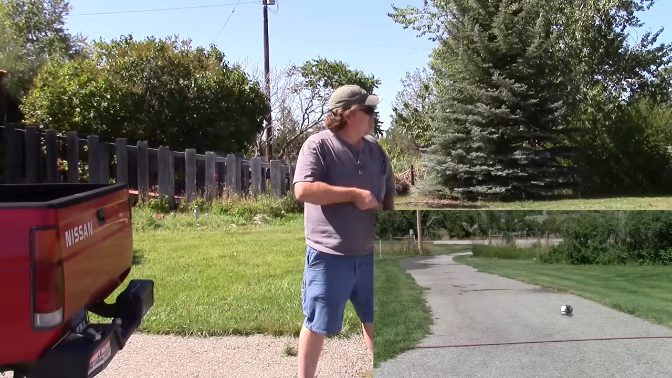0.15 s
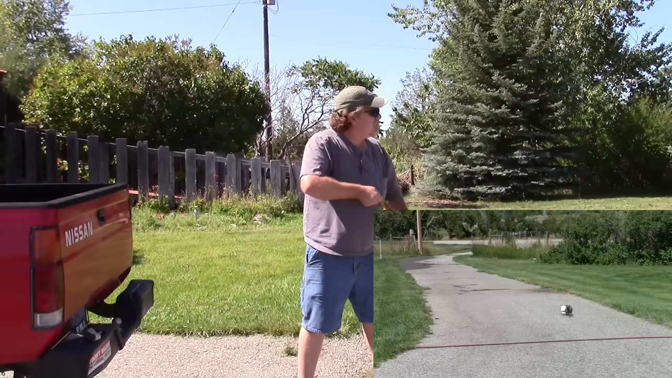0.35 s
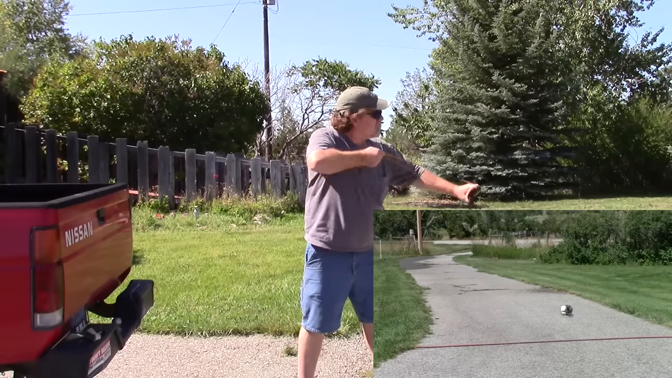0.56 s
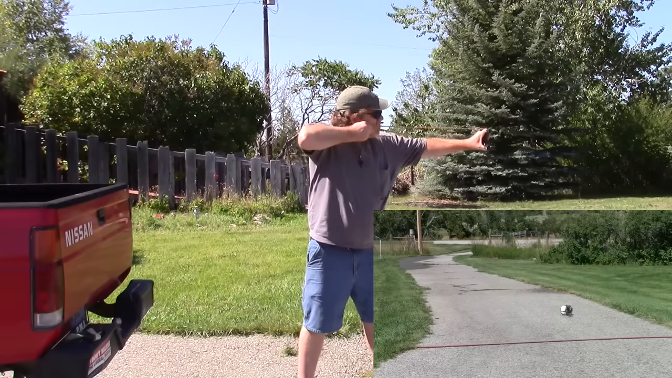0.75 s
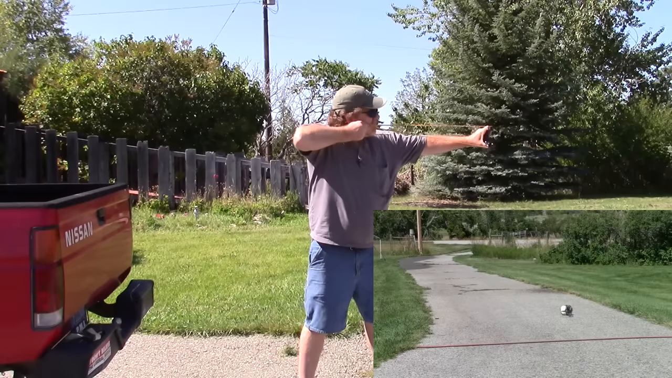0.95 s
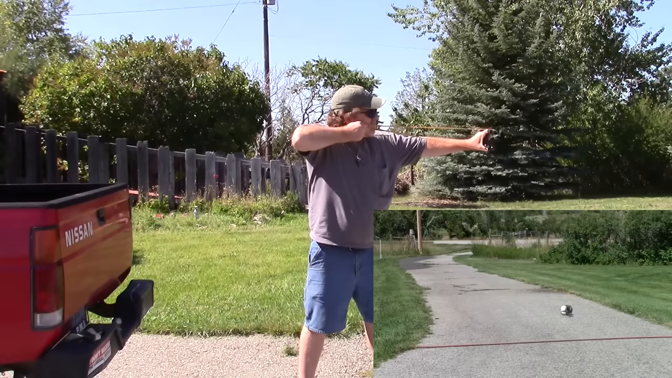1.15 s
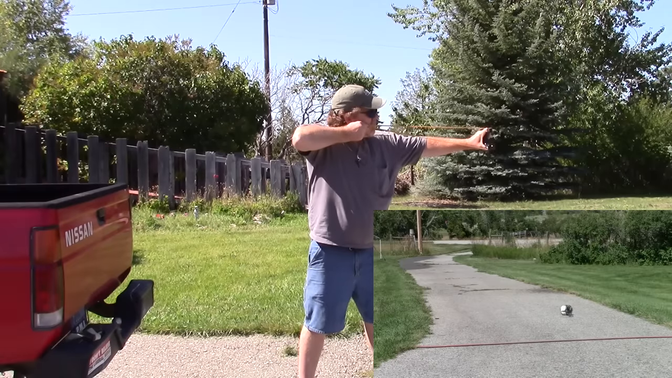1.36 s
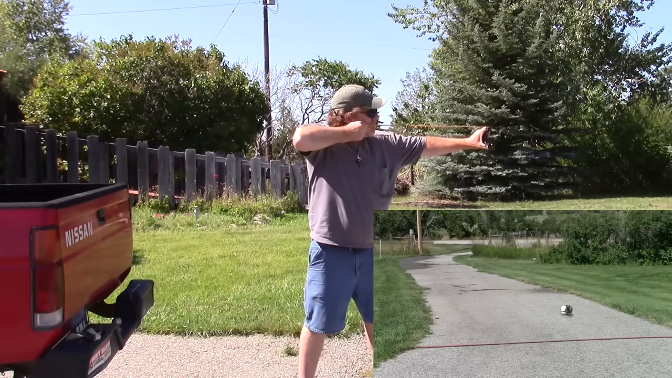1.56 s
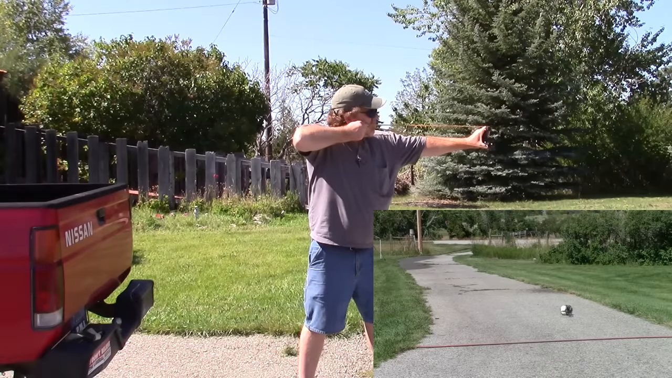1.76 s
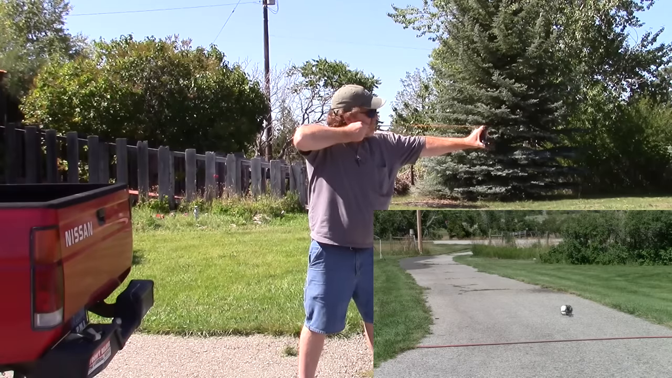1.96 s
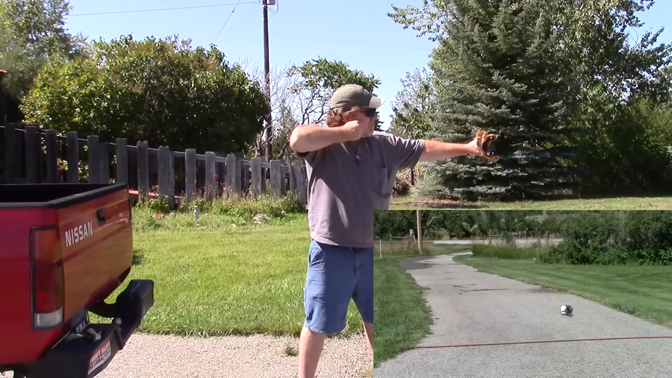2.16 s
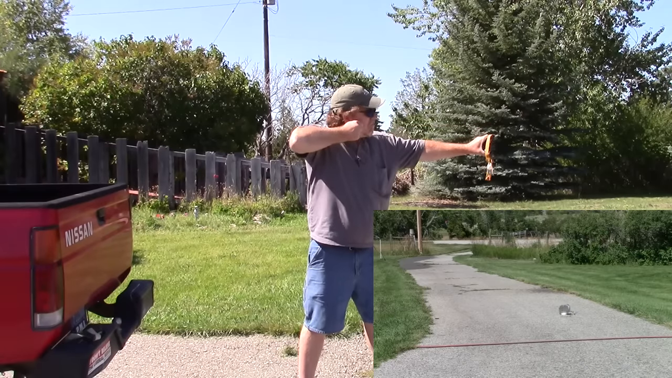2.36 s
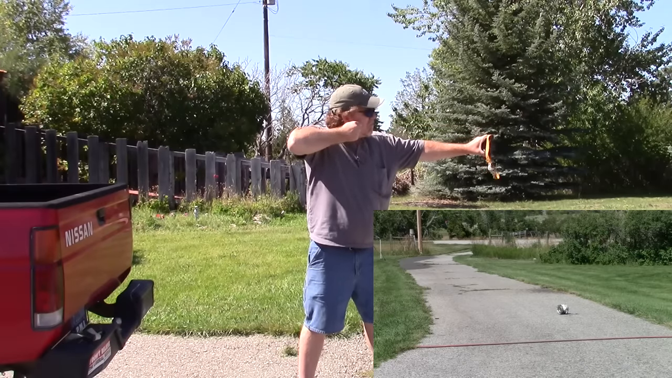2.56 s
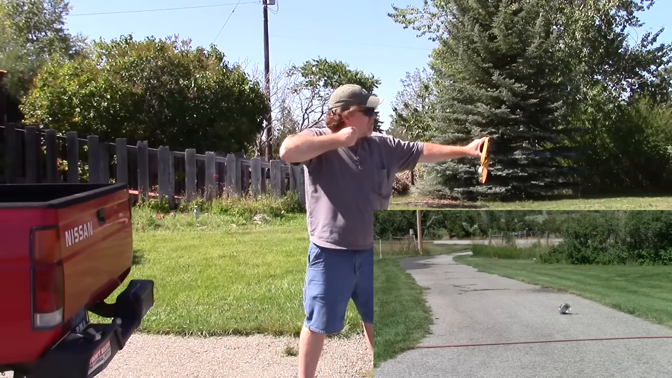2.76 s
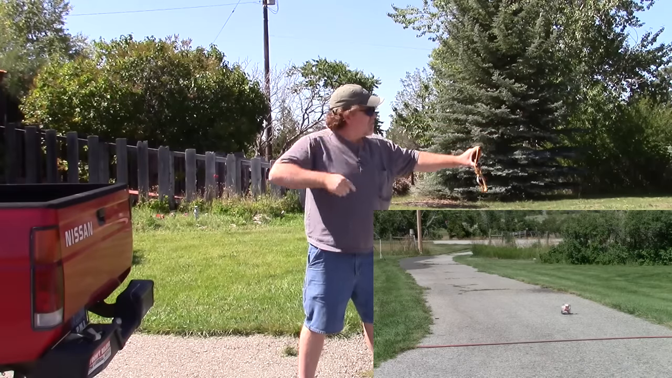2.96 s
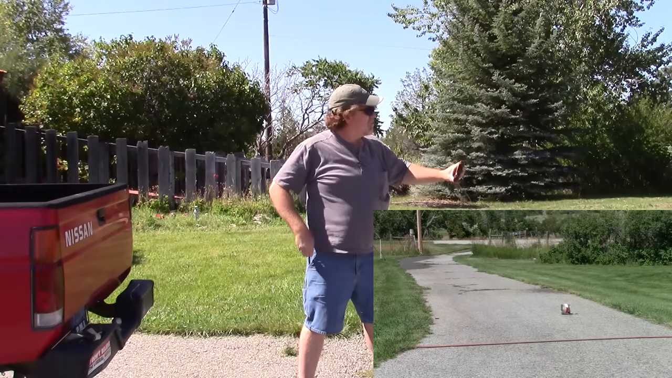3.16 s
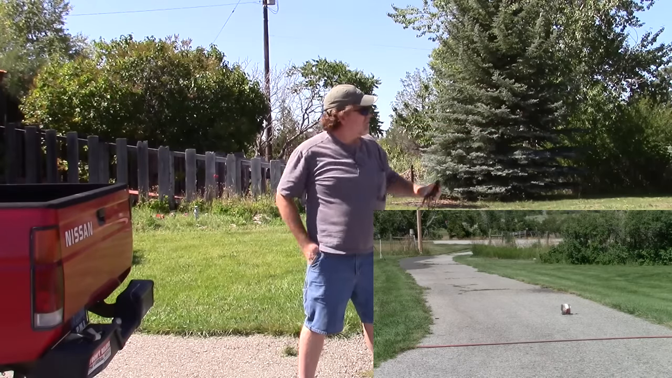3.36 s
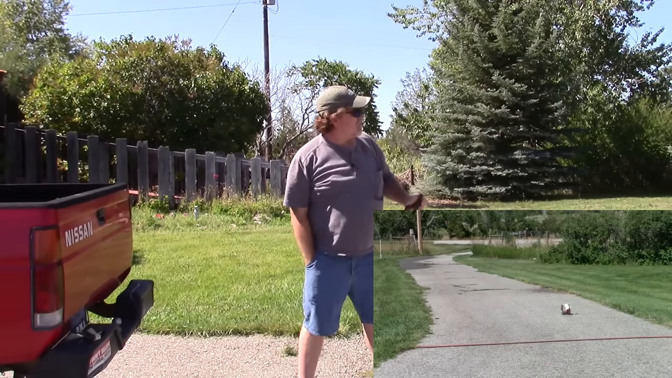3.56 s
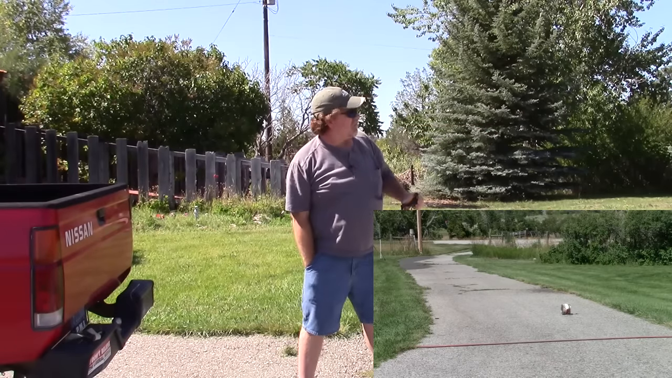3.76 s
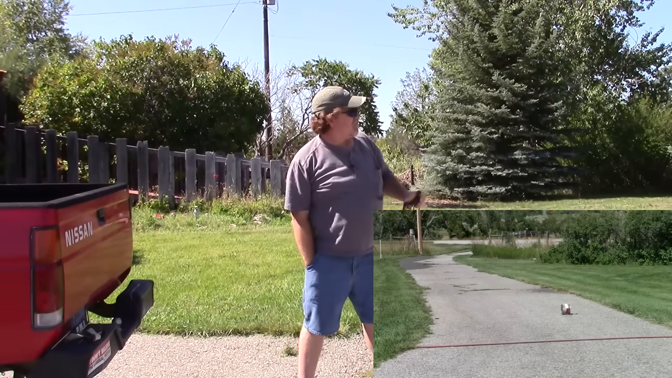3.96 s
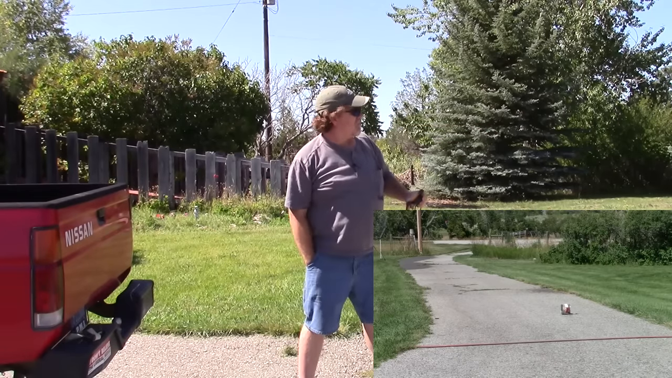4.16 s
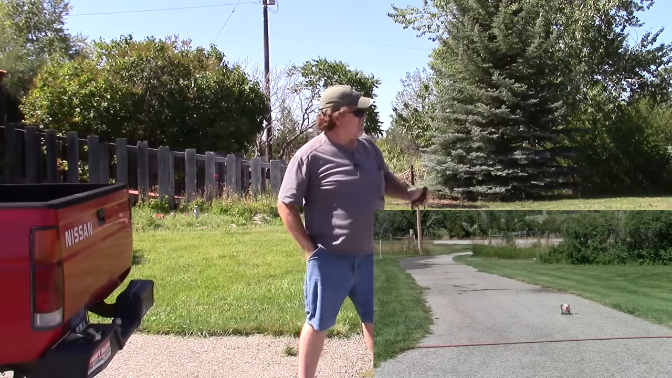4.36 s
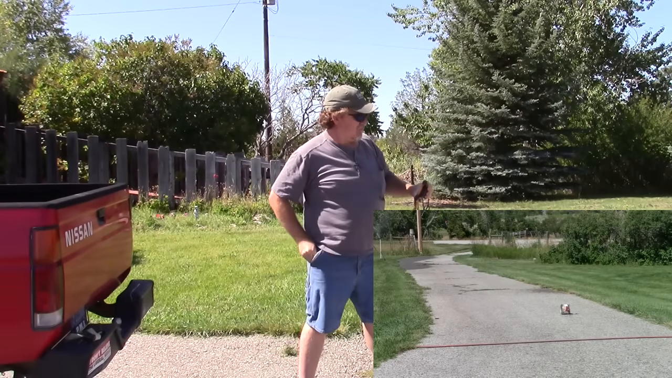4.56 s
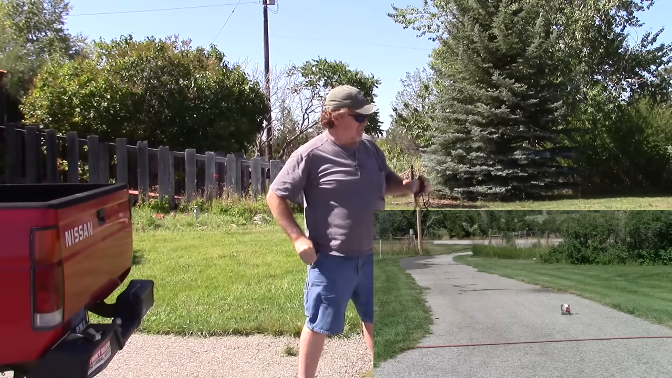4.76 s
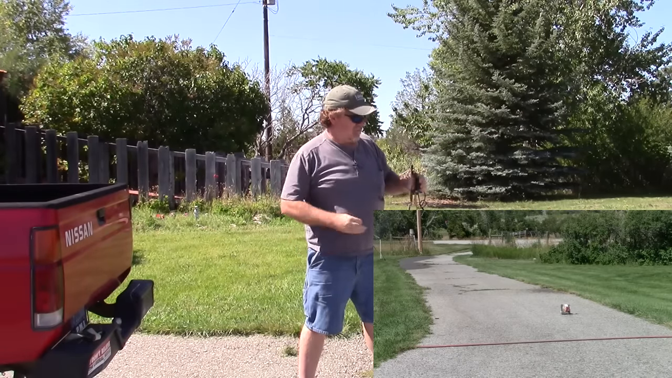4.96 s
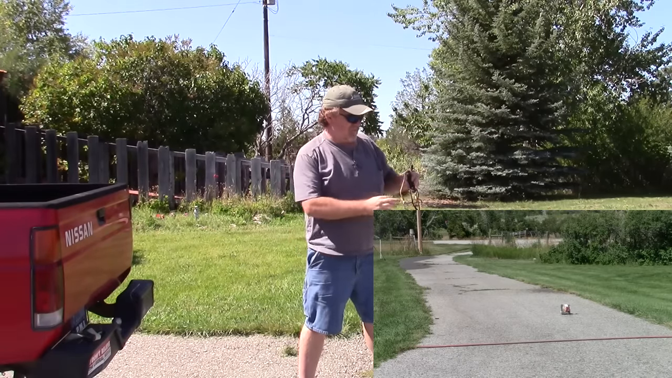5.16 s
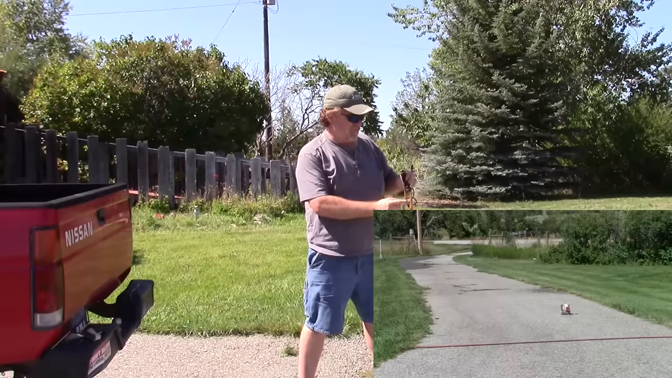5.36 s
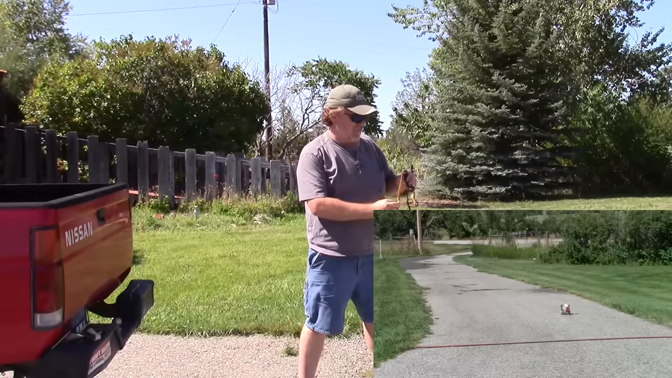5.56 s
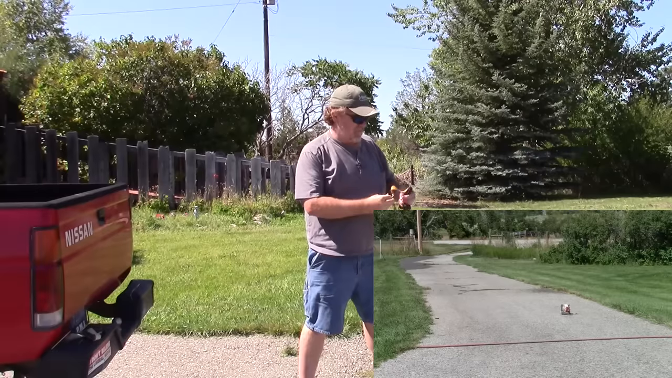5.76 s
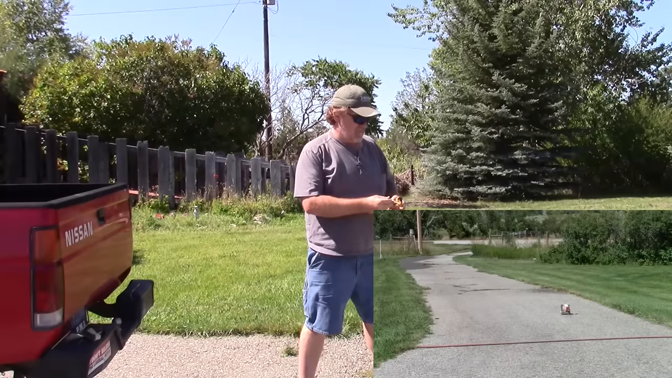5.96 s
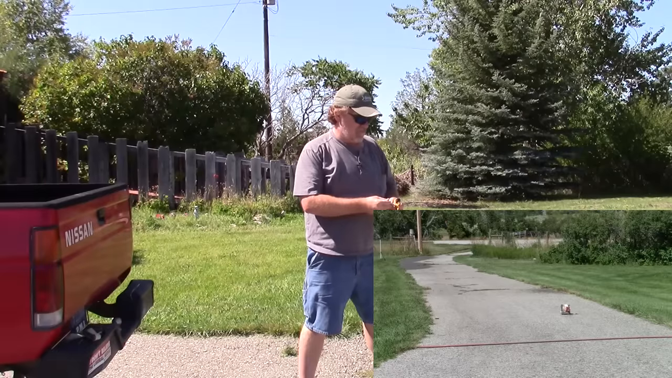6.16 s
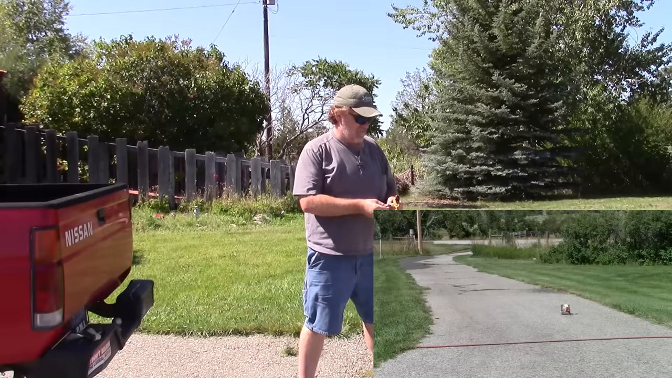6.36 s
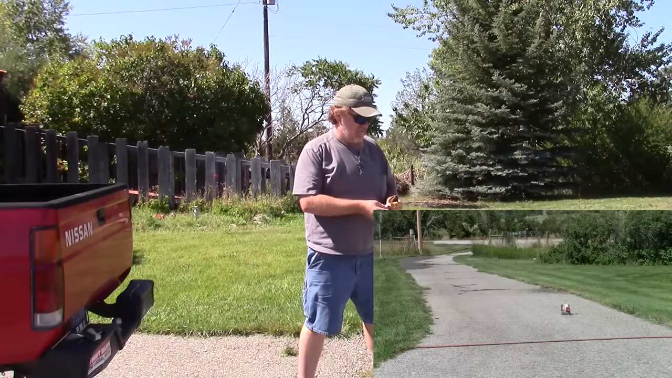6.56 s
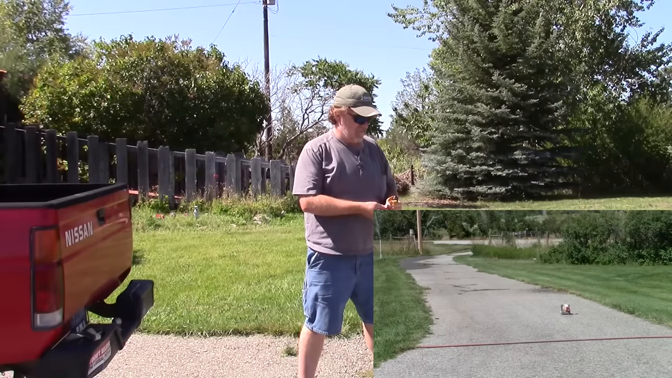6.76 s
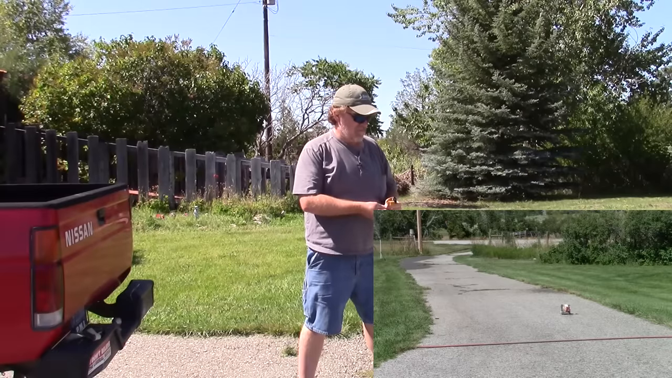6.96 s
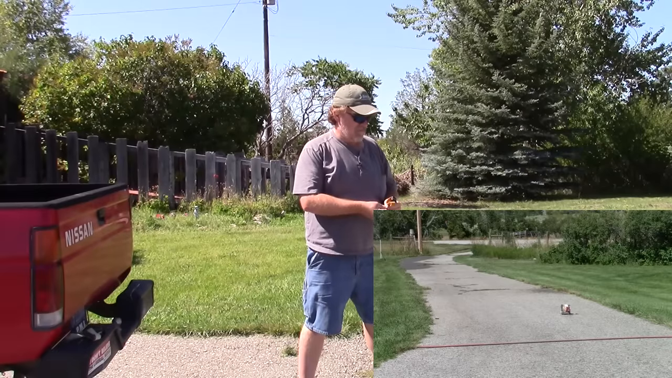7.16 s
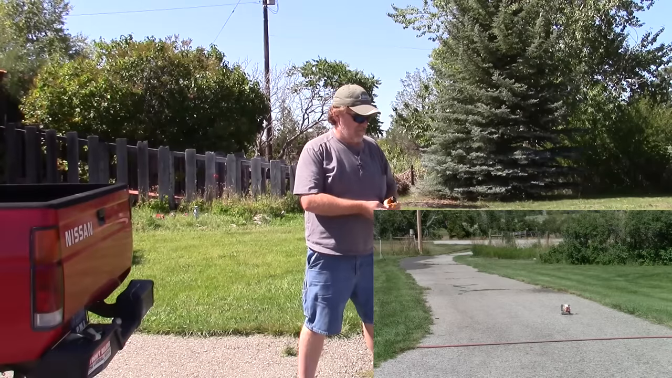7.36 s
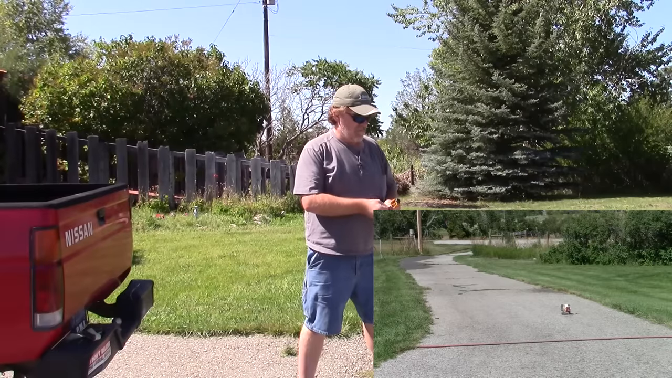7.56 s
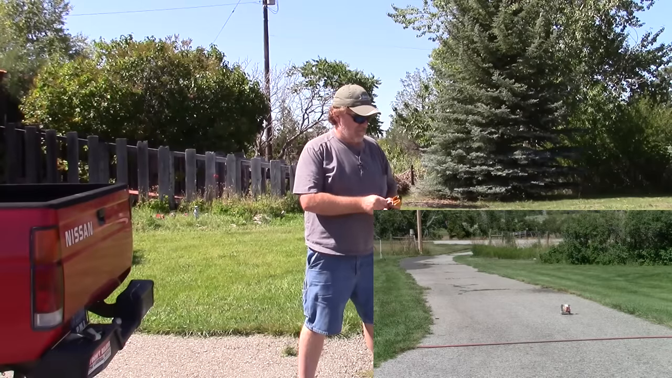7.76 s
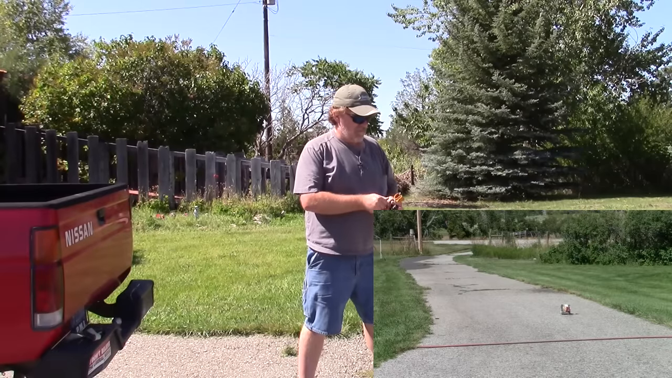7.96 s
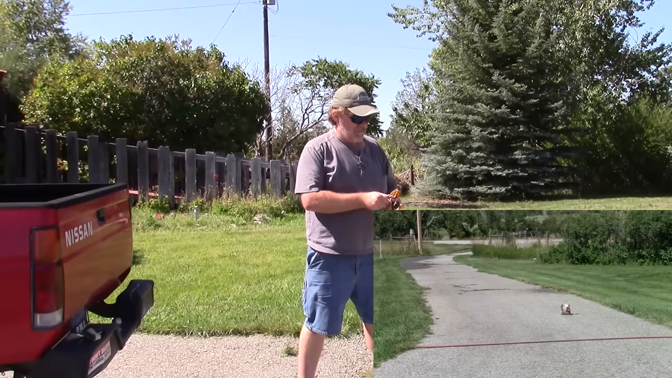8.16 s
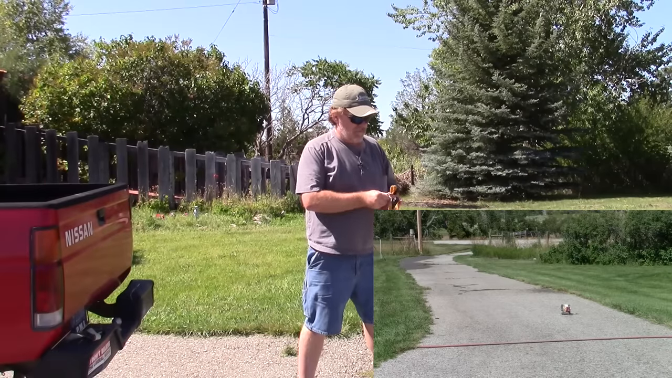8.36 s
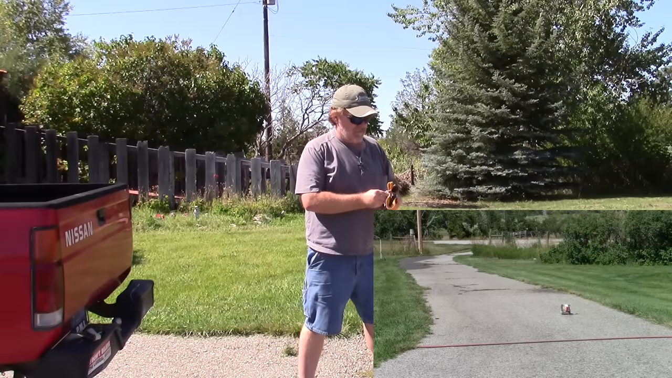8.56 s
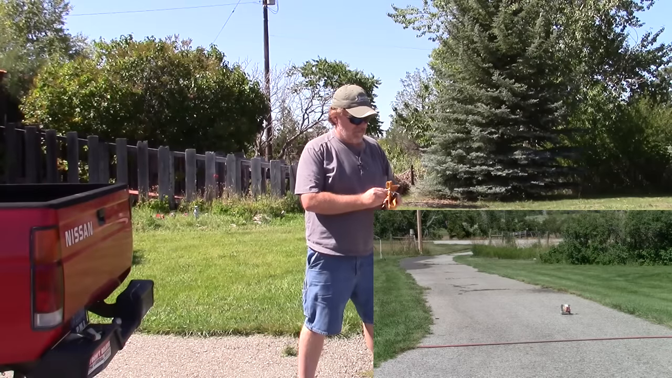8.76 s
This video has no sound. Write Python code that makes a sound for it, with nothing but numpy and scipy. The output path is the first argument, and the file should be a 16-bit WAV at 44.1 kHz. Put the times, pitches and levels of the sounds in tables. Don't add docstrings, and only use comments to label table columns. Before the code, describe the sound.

Outdoors in a yard, a sprinkler close to the microphone chops about seven times a second throughout. A car's tyre roar fades down the road. Faint rubber creaks, then a slingshot releases with a very loud dry crack around two seconds. A moment later a tin can clanks hollowly and rattles on the path. Afterwards only the sprinkler, a softer distant sprinkler and low rumble remain, with small clicks of fingers on the pouch.

```python
import sys
import numpy as np
from scipy import signal
from scipy.fft import rfft, irfft, next_fast_len
from scipy.io import wavfile
from scipy.ndimage import uniform_filter1d

SR = 44100
rng = np.random.default_rng(int(sys.argv[2]) if len(sys.argv) > 2 else 0)


def generate_wav(signal):
    frames = np.transpose(np.atleast_2d(signal))
    scaled = np.clip(frames, -1, 1) * 32767
    pcm = np.round(scaled).astype(np.int16)
    wavfile.write(sys.argv[1], SR, pcm)


def invert_db(x):
    u = np.asarray(x, float) / 20
    return 10 ** u


N = 388962
T = np.arange(N) / SR

# time_s, level_db, centre_hz
STRETCH = [
    (.3, -70, 6000),
    (.4, -65, 6500),
    (.5, -65, 7000),
    (.6, -58.5, 8500),
    (.7, -61, 10000),
    (.75, -66, 9000),
    (.79, -86, 9010),
]
# start_s, peak_db, centre_hz
SLIPS = [(0.2778, -43, 7420), (0.3694, -47, 5380), (0.3893, -43, 7170), (0.4983, -42, 6360),
         (0.5478, -45, 5010), (0.5848, -38, 8440), (0.6074, -40.5, 7610), (0.6238, -42, 9500),
         (0.6394, -44.5, 9350), (0.6595, -48, 11600), (0.6863, -39, 6500), (0.7347, -38, 7900)]
# start_s,
# peak_db, centre_hz, width_hz, t60_s
SLAPS = [(2.0598, -8, 12800, 3000, .005), (2.0598, -5, 5500, 7000, .005), (2.063, -17, 5000, 10000, .12),
         (2.071, -15, 6000, 12000, .03), (2.0734, 8, 8500, 9000, .016), (2.0768, 0, 6300, 3500, .014),
         (2.0805, -4, 6300, 5000, .014), (2.084, -6, 6800, 3000, .012), (2.0742, 1, 560, 500, .03),
         (2.0745, -4, 1300, 2000, .05), (2.0765, -11, 5000, 10000, .09), (2.0893, -12, 10000, 14000, .01),
         (2.09, -34, 3500, 7000, .35), (2.1135, -19, 1500, 3000, .01), (2.1215, -28, 5000, 10000, .012),
         (2.1615, -34, 6000, 6000, .015), (2.1685, -30, 6000, 4000, .04), (2.1965, -36, 3200, 2500, .02),
         (2.213, -38, 4000, 6000, .015), (2.93, -43, 3200, 1500, .03), (2.9657, -39, 3200, 4000, .025),
         (2.386, -34, 9000, 12000, .025), (2.381, -19, 1600, 450, .06)]
# start_s, peak_db, centre_hz, width_hz, t60_s
HANDLING = [
    (6.47, -49, 13000, 4980, 0.1),
    (8.33, -42.5, 11000, 8000, .008),
    (8.752, -46, 8970, 5000, 0.19),
]
# (pitch_hz, level_db, t60_s)
WHIP = (2.0604, .0012, [(1960, 1, .007), (3500, -1, .0045)])
# start_s, peak_db, length_s (negative for a pull)
SHOVES = [
    (2.0646, -9, -.0017),
    (2.0648, -12, .015),
    (2.0765, -10, -.0009),
    (2.105, -25, .035),
    (2.931, -29, .0022),
    (2.972, -32, .0022),
]
# pitch_hz, level_db, t60_s
CAN_AIR = [(515, -6, .05), (568, 0, .085)]
# pitch_hz, level_db, t60_s
CAN_END = [(689, -5, .32), (716, -20, .15)]
# pitch_hz, level_db, t60_s
CAN_WALL = [(840, -15, 0.24), (990, -18, 0.2), (1083, -20, 0.18), (1220, -24, 0.11)]
# pitch_hz, level_db, t60_s
CAN_RIM = [(1540, -14, .07), (1640, -17, .14), (1728, -22, .1), (2261, -22, 0.1), (2430, -14, 0.11),
           (2670, -21, .08), (3100, -21, 0.06), (5394, -18, 0.055)]
# start_s, peak_db, air_pitch_share (ratio), end_ring_db, wall_ring_db
KNOCKS = [(2.3385, -4, 0.92, 2.5, -1), (2.4105, -19, .97, -12, -6), (2.461, -28, .99, -8, 0),
          (2.504, -17, 0.95, -12, 4), (3.1788, -27.5, .9, 0, 11), (3.2095, -27.5, .9, 2, 12),
          (3.231, -31, 0.89, 3, 11), (2.5715, -22, .99, -12, 8), (2.608, -31, 1.2, 5, 7),
          (2.624, -29, 0.89, -10, 0), (2.653, -30, .95, -7, 3), (3.248, -33, 0.94, 1, 4),
          (3.278, -39, 1.0, 4, 3), (4.41, -39.5, .9, -5, -1)]
# pitch_hz, density_db (per Hz)
CRUNCH = [(530, -18), (900, -7), (1540, -3.5), (2070, -6), (2990, -6), (3890, -17.5), (5300, -16),
          (5690, -17.5), (9720, -25.5), (15400, -45.5)]
# pitch_hz, density_db (per Hz)
SPLASH = [(710, -38), (1200, -3), (1440, -2.5), (1920, -16), (2590, -4.5), (2880, -3.5), (3140, 0.5),
          (3390, -5.5), (4020, -9.5), (4380, -5.5), (5660, -1.5), (6360, -3.5), (9860, -13), (15400, -29)]
# pitch_hz, width_hz, level_db
ARM_RING = [(2930, 26, -4), (4070, 84, -3), (4530, 83, -1.5), (5440, 81, -11.5), (5640, 12, -5),
            (6750, 49, 2), (7850, 420, -13.5), (9790, 230, -9)]
# blow_number (count), time_s
ARM_BEAT = [(0, .027), (17, 2.309), (37, 5.0082), (51, 6.9013), (65, 8.7892)]
# time_s, peak_db, splash_breadth_db
ARM_AIM = [(0, -31.5, 6), (.5, -32.5, 4), (1.1, -32.5, 8), (1.6, -34, 11), (2.1, -28, 6), (2.8, -34.5, 9.5),
           (3.3, -31, 1.5), (4.2, -31.5, 2.5), (4.9, -31, -1), (5.4, -32, 0.1), (6.1, -31, -1),
           (6.999, -31, -1.5), (7.5, -30.5, -0.5), (8.299, -31, -4), (8.8, -31.5, 3)]
# start_s, end_s, beat_s, level_db, treble_db
FAR_ARM = [
    (3.503, 5.196, .1102, -62, -8.5),
    (5.307, 5.6, .048, -60.5, -12),
    (5.639, 5.95, .048, -56, -10.5),
    (5.972, 6.72, .048, -59.5, -4),
    (6.803, 7.598, .1105, -60.5, -1.5),
    (7.688, 8.8, .1105, -58, -2),
]
# time_s, level_db, roar_centre_hz
CAR = [(0, -39.5, 1051), (.5, -42.5, 1009), (.66, -40, 900), (.85, -41.5, 1177), (1.15, -45, 1195),
       (1.69, -48, 765), (1.969, -39.5, 790), (2.3, -47.5, 684), (2.9, -51, 794), (3.7, -50.5, 847.6),
       (4.6, -53, 900), (5, -54.5, 881), (5.8, -55.5, 947.4), (6.4, -53.5, 1007), (6.9, -56, 857.4),
       (7.6, -54, 853), (8.201, -53.5, 820), (8.82, -55, 830)]
# time_s, level_db, centre_hz
TREAD = [
    (0, -46, 1050),
    (.15, -37.5, 1023),
    (.3, -44, 999),
    (.55, -52.5, 1145),
    (.8, -45.5, 1268),
    (1.3, -55.5, 1348),
    (1.6, -73, 1303),
    (1.95, -41, 1390),
    (2.1, -60, 1420),
]
# pitch_hz, density_db (per Hz)
ROAR = [(190, -37), (330, -6.5), (456, 1), (880, 0), (1050, -3), (1390, -2), (1630, -4.5), (2180, -11),
        (3020, -17), (4000, -20.5), (5200, -47.5), (8800, -120)]
# pitch_hz, density_db (per Hz)
DRONE = [(62, -31), (105, -1), (189, -2.5), (252, -8.5), (301, -14), (356, -17.5), (380, -20), (490, -49.5),
         (840, -120)]
# pitch_hz, density_db (per Hz)
RUMBLE = [(11, -28.5), (18, -4), (32, 4.5), (125, -1.5), (160, -30), (280, -120)]
# pitch_hz, density_db (per Hz)
HISS = [(1060, -35), (1800, -7.5), (2270, -7), (3060, -2.5), (4040, -8.5), (4550, -4.5), (5690, -5.5),
        (9770, -11), (15400, -13.5)]
# time_s, peak_db, length_s
PUFFS = [
    (0.794, -26.5, 0.021),
    (0.853, -27, 0.021),
    (0.997, -29, 0.026),
    (3.5, -42, 0.042),
    (6.001, -35.5, 0.045),
    (6.543, -42, 0.031),
    (7.054, -43, 0.053),
]
# start_s, end_s, kept_below_hz
STARVED = [
    (2.046, 2.0562, 900),
    (2.323, 2.3352, 600),
]

SLAP_HOLD_S = .0015
SLEEVE_HZ, SLEEVE_DB = 2700, 1
FREE_HARD, FREE_SOFT = .9, .45
GRIT_DB, GRIT_T60_S = -26, .05
ARM_SCATTER_DB, BREADTH_SCATTER_DB, LOW_SHARE = 0.64, 1, .9
FAR_DB = -55
DRONE_DB, DRONE_SLOPE, DRONE_SAG_DB_PER_S = -53, 0.86, 0.91
RUMBLE_DB, RUMBLE_SLOPE, SPRAY_DB = -48, 0.61, -64.5
DUCK_S, DUCK_DB, DUCK_HOLD_S, RECOVER_S = 1.9, -5.5, 0.55, 1.9


def add(out, s, sound):
    i = int(s * SR)
    out[i:i + len(sound)] += sound[:N - i]


def unit(x):
    return x / np.sqrt(np.mean(x ** 2))


def coloured(points, size=N):
    size = next_fast_len(size)
    hz = np.fft.rfftfreq(size, 1 / SR) + 1e-3
    at, db = np.transpose(points)
    gain = invert_db(np.interp(np.log(hz), np.log(at), db, -90, -90))
    return unit(irfft(rfft(rng.standard_normal(size)) * gain, size))


def band(x, hz, width_hz):
    hz = min(hz, .45 * SR)
    return signal.lfilter(*signal.iirpeak(hz, hz / min(width_hz, .4 * SR), SR), x)


def fade(t, hold, t60):
    return np.clip(t / .0004, 0, 1) * invert_db(-60 * np.clip(t - hold, 0, None) / t60)


def walk(rate):
    count = int(T[-1] * rate) + 2
    return 1.2 * np.interp(T * rate, np.arange(count), rng.standard_normal(count))


def rings(modes, t):
    return sum(invert_db(db - 60 * t / t60) * np.sin(2 * np.pi * hz * t) for hz, db, t60 in modes)


def living(points, flicker_db, rate, centre_hz=None, bump_db=0):
    noise = coloured(points)
    whole, hz, out = rfft(noise), np.fft.rfftfreq(len(noise), 1 / SR), 0
    lowest, highest = points[0][0], points[-1][0]
    edges = lowest * 2 ** np.arange(0, np.log2(highest / lowest) + 1 / 3, 1 / 3)
    for lo, hi in zip(edges, edges[1:]):
        db = flicker_db * walk(rate)
        if centre_hz is not None:
            octaves = np.log2(centre_hz / np.sqrt(lo * hi))
            db = db + bump_db * np.exp(-(octaves / 0.69) ** 2)
        out = out + invert_db(db) * irfft(whole * ((hz >= lo) & (hz < hi)), len(noise))[:N]
    return unit(out)


def creak():
    s, db, hz = np.transpose(STRETCH)
    slips = rng.standard_normal(N) * invert_db(3 * walk(150))
    centre_hz = np.interp(T, s, hz)
    rubber = 0
    for c in (5534, 7000, 8500, 10000, 11600):
        rubber = rubber + np.exp(-((centre_hz - c) / 1800) ** 2) * band(slips, c, 1800)
    sleeve = band(band(slips, SLEEVE_HZ, 900), SLEEVE_HZ, 900)
    return invert_db(np.interp(T, s, db, -120, -120)) * (unit(rubber) + invert_db(SLEEVE_DB) * unit(sleeve))


def slingshot():
    out, t = creak(), T[:int(.25 * SR)]
    slips = [(*slip, 2200, .03) for slip in SLIPS]
    for s, db, hz, width_hz, t60 in SLAPS + HANDLING + slips:
        noise = band(rng.standard_normal(len(t)), hz, width_hz)
        slap = unit(band(noise, hz, 2.0 * width_hz))
        add(out, s, invert_db(db - 10.5) * fade(t, SLAP_HOLD_S, t60) * slap)
    s, hold, tones = WHIP
    add(out, s, sum(invert_db(db) * fade(t, hold, t60) * np.cos(2 * np.pi * hz * t) for hz, db, t60 in tones))
    for s, db, length in SHOVES:
        add(out, s, invert_db(db) * np.sin(np.pi * t / length) * np.exp(-(t / length) ** 2))
    return out


def can_blow(t, db, share, end_db, wall_db):
    hard = np.interp(db, (-16, -8), (0, 1))
    free = FREE_SOFT + hard * (FREE_HARD - FREE_SOFT)
    modes = [(hz * share, d, t60) for hz, d, t60 in CAN_AIR]
    for part, part_db in ((CAN_END, end_db), (CAN_WALL, wall_db), (CAN_RIM, 0)):
        modes += [(hz, d + part_db, t60 * free) for hz, d, t60 in part]
    scatter = rng.standard_normal((len(modes), 2))
    struck = [(hz * (1 + .004 * a), d + 1.5 * b, t60) for (hz, d, t60), (a, b) in zip(modes, scatter)]
    ms = np.interp(db, (-20, -8), (.6, .15))
    push = np.exp(-((t * 1000 - 2 * ms) / (.6 * ms)) ** 2)
    scrape = invert_db(-46) * rng.standard_normal(len(t)) * fade(t, .006, .12)
    ring = signal.fftconvolve(rings(struck, t), push / push.sum() + scrape)[:len(t)]
    ring = ring * (1 - np.exp(-(t / .0021) ** 2))
    return invert_db(db) * ring / np.abs(ring).max()


def can():
    out, t = np.zeros(N), T[:int(.4 * SR)]
    for s, db, share, end_db, wall_db in KNOCKS:
        add(out, s, can_blow(t, db, share, end_db, wall_db))
        grit = coloured(CRUNCH[1:], size=len(t))[:len(t)]
        add(out, s, invert_db(db + GRIT_DB) * fade(t, .002, GRIT_T60_S) * grit)
    crumple = fade(t, 0.0032, 0.047) * np.clip(t / 0.0016, 0, 1)
    yard_tail = invert_db(-21 + 1.9 * walk(151.6)[:len(t)]) * fade(t, 0.011, 0.41)
    echo = invert_db(-27) * fade(t - .048, 0.0037, 0.02)
    crunch = crumple + yard_tail + echo
    add(out, 2.339, invert_db(-12) * crunch * coloured(CRUNCH, size=len(t))[:len(t)])
    return signal.sosfilt(signal.butter(6, 420, "high", fs=SR, output="sos"), out)


def sprinkler():
    out, t = np.zeros(N), T[:int(.13 * SR)]
    drops = fade(t, 0.0084, .075)
    sheet = invert_db(-1.5) * fade(t, 0.00072, 0.0046)
    fence = invert_db(-18.5) * fade(t - .048, .004, .08)
    shape = drops + sheet + fence
    count, at = np.transpose(ARM_BEAT)
    times = np.interp(np.arange(count[-1] + 1), count, at)
    aim_s, aim_db, breadth_db = np.transpose(ARM_AIM)
    for s, (a, b, c) in zip(times, rng.standard_normal((len(times), 3))):
        db = np.interp(s, aim_s, aim_db) + ARM_SCATTER_DB * a
        wide_db = np.interp(s, aim_s, breadth_db)
        low_db = LOW_SHARE * wide_db + BREADTH_SCATTER_DB * b
        high_db = wide_db + BREADTH_SCATTER_DB * c
        tilt = [(hz, d + np.interp(hz, (3000, 5000, 9000), (low_db, 0, high_db))) for hz, d in SPLASH]
        splash = coloured(tilt, size=len(t))[:len(t)]
        metal = unit(sum(invert_db(d) * band(splash, hz, 0.76 * w) for hz, w, d in ARM_RING))
        tick = unit(band(rng.standard_normal(len(t)), 10500, 9900))
        add(out, s, invert_db(db + high_db - 24) * fade(t, 0.00044, 0.011) * tick)
        add(out, s, invert_db(db - 14.0) * shape * (splash + invert_db(-12.5) * metal))
    return out


def far_sprinkler():
    out, t = np.zeros(N), T[:int(.08 * SR)]
    for s0, s1, beat, db, treble_db in FAR_ARM:
        for s in np.arange(s0, s1, beat):
            noise = rng.standard_normal(len(t))
            body = unit(band(band(noise, 2730, 845), 3100, 1104))
            treble = unit(band(band(noise, 6400, 2500), 7500, 3000))
            splash = body + invert_db(treble_db) * treble
            add(out, s, invert_db(db + 1.6 * noise[0]) * fade(t, 0.0058, 0.038) * splash)
    return out


def tread():
    s, db, hz = np.transpose(TREAD)
    slow = [coloured([(1, 0), (90, 2.5), (220, -20)])[:N] for _ in range(2)]
    turn = 2 * np.pi * np.cumsum(np.interp(T, s, hz)) / SR
    whine = slow[0] * np.cos(turn) + slow[1] * np.sin(turn)
    return invert_db(np.interp(T, s, db, -120, -120)) * whine


def yard():
    s, db, hz = np.transpose(CAR)
    roar_db, roar_hz = np.interp(T, s, db), np.interp(T, s, hz)
    near_db = np.clip(roar_db - FAR_DB, 0, None)
    rumble_db = RUMBLE_DB + RUMBLE_SLOPE * near_db + 0.92 * walk(3)
    out = invert_db(rumble_db) * coloured(RUMBLE)[:N]
    drone_db = DRONE_DB + DRONE_SLOPE * near_db - DRONE_SAG_DB_PER_S * (T - 3.5) + 1.5 * walk(4)
    out += invert_db(drone_db) * living(DRONE, flicker_db=2.65, rate=9.8)
    out += invert_db(roar_db) * living(ROAR, flicker_db=0.84, rate=4.1, centre_hz=roar_hz, bump_db=7.0)
    out += invert_db(SPRAY_DB + 1.0 * walk(6.3)) * living(HISS, flicker_db=-0.2, rate=12)
    gust = sum(invert_db(db) * np.exp(-((T - s) / length) ** 2) for s, db, length in PUFFS)
    wind = coloured([(15, -18), (35, 10), (90, 0.5), (200, -18.0), (400, -32)])[:N]
    return out + gust * wind


def scene():
    duck_at = (0, .01, DUCK_HOLD_S, DUCK_HOLD_S + RECOVER_S)
    duck_db = DUCK_DB * np.interp(T - DUCK_S, duck_at, (0, 1, 1, 0))
    surroundings = yard() + sprinkler() + far_sprinkler() + tread()
    return (invert_db(duck_db) * surroundings + slingshot() + can())[None]


def low_pass(x):
    return signal.sosfilt(signal.butter(12, 15600, fs=SR, output="sos"), x)


def record(dry):
    out = signal.sosfilt(signal.ellip(8, .2, 35, 15900, fs=SR, output="sos"), dry)
    out = np.clip(out, -.99, .99)
    for s0, s1, hz in STARVED:
        dull = signal.sosfiltfilt(signal.butter(4, hz, fs=SR, output="sos"), out * (T < s1))
        inside = uniform_filter1d(1. * ((T > s0) & (T < s1)), 40)
        out = out + inside * (dull - out)
    return low_pass(out)


dry = scene()
out = record(dry)
generate_wav(out)
```